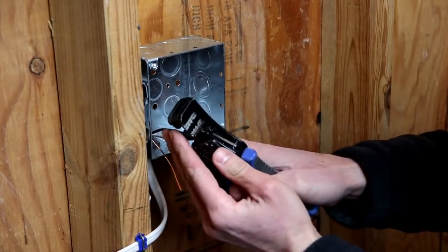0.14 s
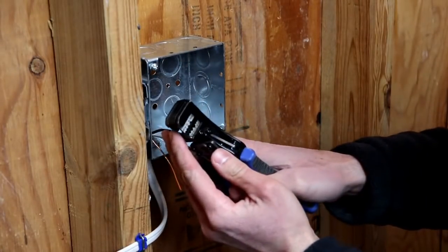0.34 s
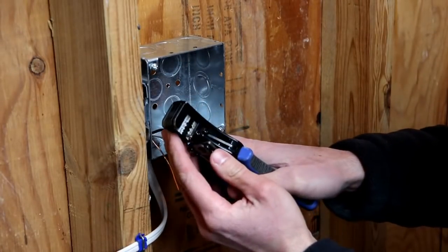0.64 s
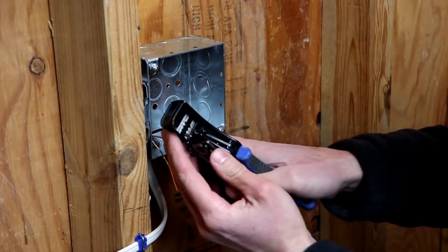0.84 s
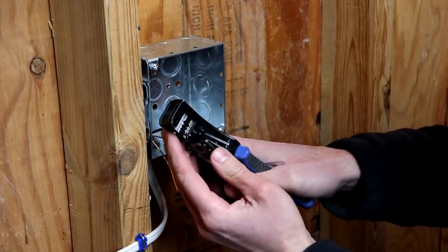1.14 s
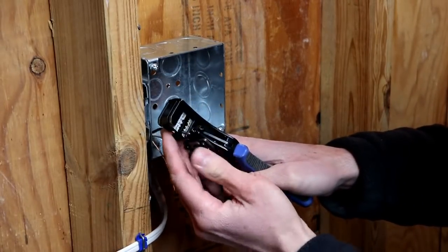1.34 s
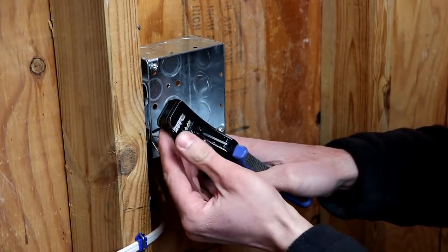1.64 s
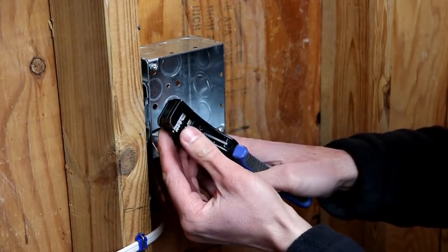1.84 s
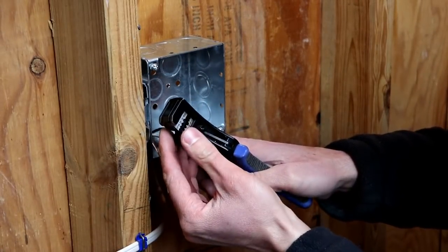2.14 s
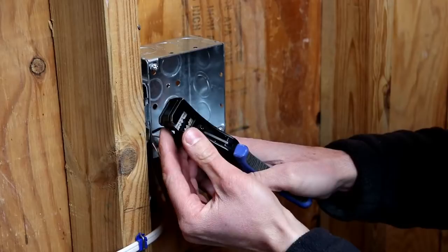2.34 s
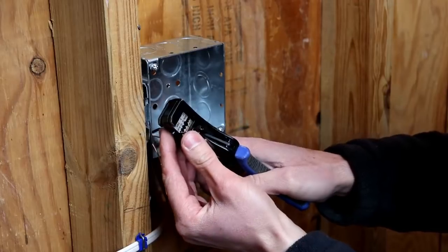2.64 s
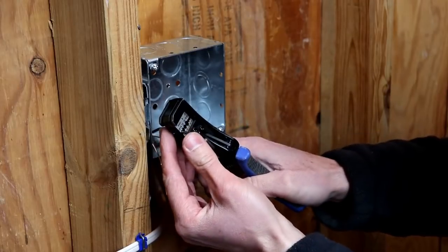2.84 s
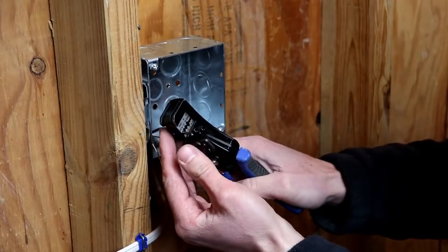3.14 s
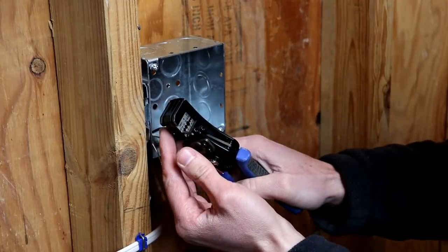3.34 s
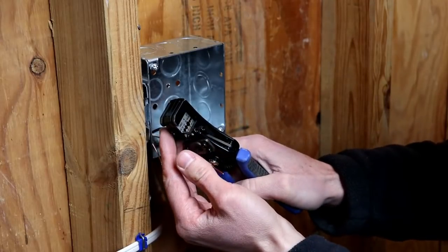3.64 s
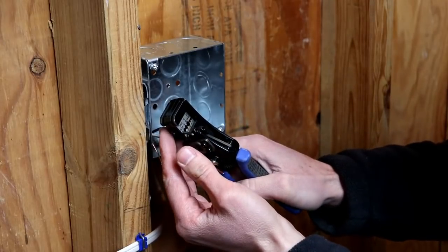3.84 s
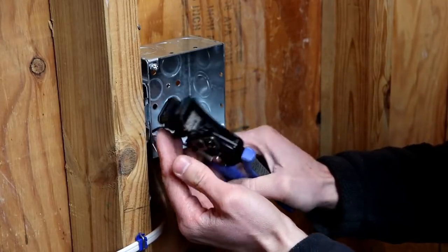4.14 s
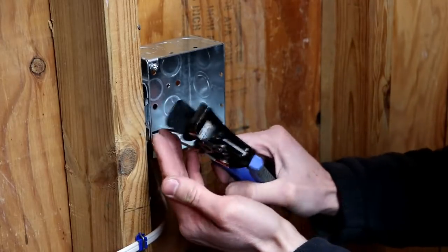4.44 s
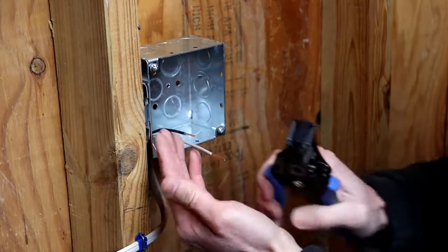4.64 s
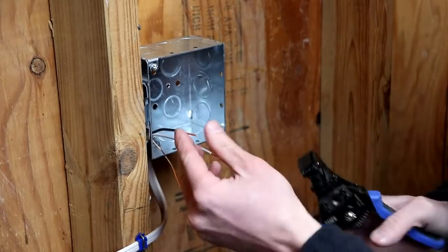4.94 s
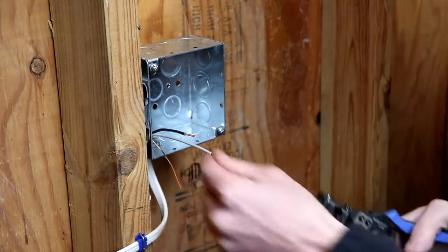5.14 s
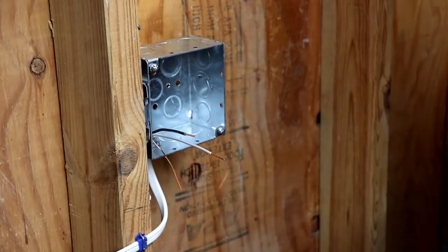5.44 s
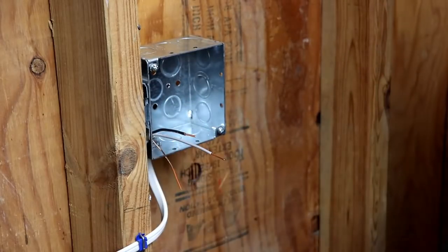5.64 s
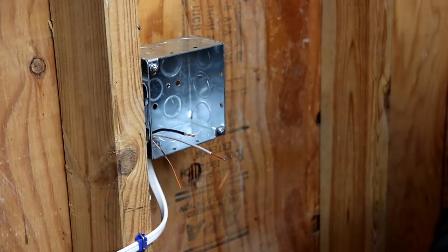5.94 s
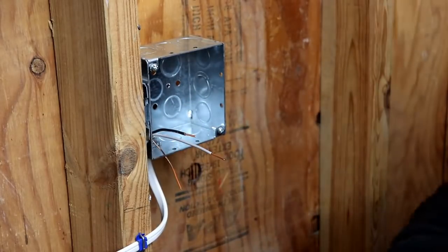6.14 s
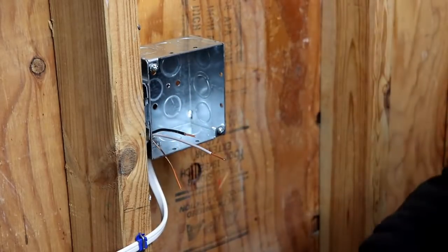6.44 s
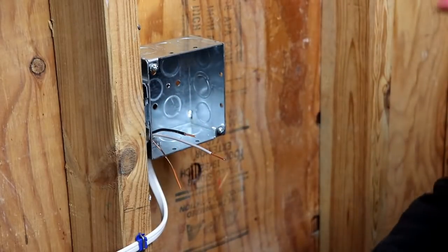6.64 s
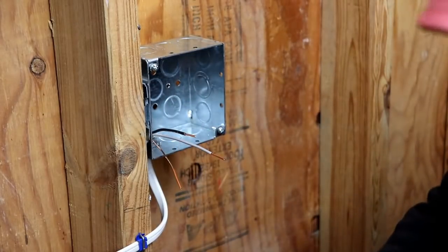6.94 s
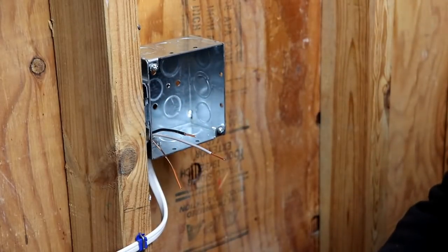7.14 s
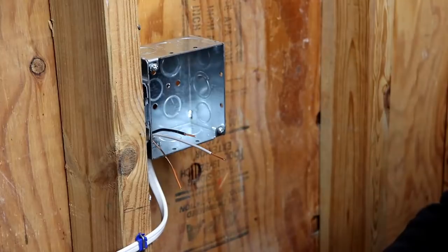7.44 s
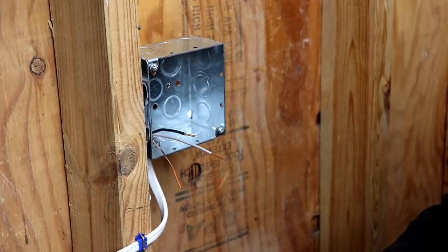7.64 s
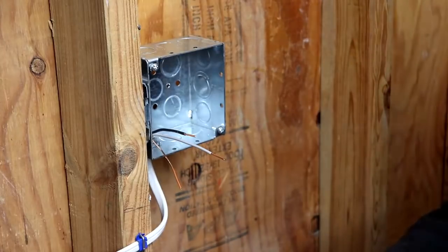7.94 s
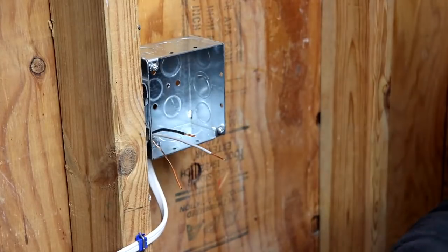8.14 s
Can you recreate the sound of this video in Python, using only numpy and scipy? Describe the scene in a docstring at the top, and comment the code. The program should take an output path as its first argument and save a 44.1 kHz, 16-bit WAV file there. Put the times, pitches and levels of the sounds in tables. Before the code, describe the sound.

A close mono microphone in a timber room picks up steady low mains hum and soft hiss. From 0 to 4 seconds there are only sparse, faint ticks and hollow clicks of wire strippers gripping cable, slightly clearer near 1.6, 2.2 and 2.8-2.9. At 4.2 the squeeze begins: a low shudder, a gritty ringing tear and a rapid ratchet of ticks until about 4.4. Hollow clacks cluster at 4.5, then a piercing steel spring snap at 4.65, loud enough to clip, with short room echo. Small clicks follow at 4.8-5.2, with a dry tap at 5.25 and soft sleeve rustles to 6.5. At 6.67 the tool lands on wood with heavy, resonant knocks, tipping again at 6.86-6.9 and settling by 7.15. Cloth rubs, light taps and short hard scrapes come at 7.3-7.9, strongest around 7.7, before a fading rustle and a tiny click near 8.

```python
"""In a timber room, automatic wire strippers work on a cable in a steel outlet box on the wall.
The jaws tick as they grip, tear the insulation off, clack open and snap back on their spring.
Then the tool lands on wood with heavy knocks, something hard is slid over it and a sleeve rustles.
Each hit is a crack and fast-fading noise shaped by its body; tearing, cloth and scraping are shaped noise.
Mains hum (sine tones) and hiss (steady noise) lie under it all."""
import sys
import numpy as np
from scipy import signal
from scipy.fft import rfft, irfft, next_fast_len
from scipy.io import wavfile
from scipy.ndimage import map_coordinates

SR = 44100
rng = np.random.default_rng(int(sys.argv[2]) if len(sys.argv) > 2 else 0)


def unload_wav(signal):
    """Save mono or channel-first audio to the path in sys.argv[1] as 16-bit WAV at rate SR, clipped to [-1, 1]."""
    wavfile.write(
        sys.argv[1],
        SR,
        np.round(np.clip(np.atleast_2d(signal).T, -1, 1) * 32767).astype(np.int16),
    )


N = 365588
TIME = np.arange(N) / SR


def from_db(db):
    """Turn decibels into gain."""
    return 10 ** (np.asarray(db) / 20)


def rms_one(x):
    """Scale each row to an average strength (rms) of 1."""
    return x / np.sqrt(np.mean(x ** 2, axis=-1, keepdims=True) + 1e-30)


def at_hz(points, hz):
    """Read a table between its points, with pitch spaced as the ear hears it (log frequency)."""
    freqs, values = np.transpose(points)
    return np.interp(np.log(hz), np.log(freqs), values)


def fade(t, t60):
    """Die away freely, 60 dB down after t60 seconds."""
    return np.exp(-np.log(1000) * t / np.maximum(t60, 1e-3))


def flicker(size):
    """Wander smoothly at random, changing over about size samples; rms 1."""
    knots = rng.standard_normal(N // size + 2)
    return rms_one(np.interp(np.arange(N) / size, np.arange(len(knots)), knots))


def coloured(spectrum):
    """Make steady noise that follows a spectrum; rms 1."""
    size = next_fast_len(N, True)
    hz = np.maximum(np.fft.rfftfreq(size, 1 / SR), 1)
    white = rfft(rng.standard_normal(size))
    return rms_one(irfft(white * from_db(at_hz(spectrum, hz)), size)[:N])


def patchy(x, patchy_db):
    """Let patches about a third of an octave wide swell and sink every few hundredths of a second."""
    hz, s, cells = signal.stft(x, SR, nperseg=512)
    where = np.meshgrid(3 * np.log2(1 + hz / 200), 40 * s, indexing="ij")
    swell = map_coordinates(rng.standard_normal((24, 400)), where, order=1)
    _, patched = signal.istft(cells * from_db(patchy_db * swell), SR)
    return rms_one(patched[:N])


def swells(middles, half_lengths, levels_db):
    """Each stroke swells and sinks in a bell shape; overlapping strokes add in power."""
    t = TIME[::64]
    power = 0
    for s, half, db in zip(middles, half_lengths, levels_db):
        bell = from_db(db) / (1 + ((t - s) / half) ** 2)
        power = power + bell ** 2
    return np.interp(TIME, t, np.sqrt(power))


def resonate(x, modes):
    """Let a body's clear resonances ring on top of the sound."""
    out = x
    for hz, width, db in modes:
        r = np.exp(-np.pi * width / SR)
        poles = [1, -2 * r * np.cos(2 * np.pi * hz / SR), r * r]
        ringing = (1 - r * r) / 2 * signal.lfilter([1, 0, -1], poles, x + 1e-18)
        out = out + from_db(db) * ringing
    return out


def causal(gain):
    """Minimum-phase response with these gains: it rings after a blow, never before."""
    cepstrum = irfft(np.log(gain + 1e-9))
    half = cepstrum.shape[-1] // 2
    fold = np.r_[1, np.full(half - 1, 2), 1, np.zeros(half - 1)]
    return np.exp(rfft(cepstrum * fold))


def broad_level(spectra):
    """Average the strength over half an octave around each frequency."""
    bins = np.arange(spectra.shape[-1])
    low = (bins * .84).astype(int)
    high = np.minimum((bins * 1.19).astype(int) + 3, len(bins))
    total = np.cumsum(np.pad(np.abs(spectra) ** 2, [(0, 0), (1, 0)]), axis=-1)
    return np.sqrt((total[:, high] - total[:, low]) / (high - low))


def contacts(rows, spectrum, crack, favour_db, favour_octaves):
    """Each contact is a crack and a fast-dying jumble in the body's colour; where it lands favours one pitch."""
    s, db, tilt_db, t60, pitch = np.transpose(rows)[:, :, None]
    t = np.arange(8192) / SR
    hz = np.maximum(np.fft.rfftfreq(len(t), 1 / SR), 1)
    envelope = fade(t, t60)
    bursts = rng.standard_normal((len(rows), len(t))) * envelope
    bursts[:, 0] += crack
    spectra = rfft(bursts)
    octaves = np.log2(hz / pitch)
    favoured_db = favour_db / (1 + (octaves / favour_octaves) ** 2)
    colour_db = at_hz(spectrum, hz) + tilt_db * octaves + favoured_db
    body = causal(from_db(colour_db) / broad_level(spectra))
    sounds = rms_one(irfft(spectra * body))
    # a slower fade carries more energy at the same level
    sounds = sounds * from_db(db) * np.sqrt(np.mean(envelope ** 2, axis=1, keepdims=True))
    out = np.zeros(N + len(t))
    for start, sound in zip((s[:, 0] * SR).astype(int), sounds):
        out[start:start + len(t)] += sound
    return out[:N]


def blows(rows, lag, rattle_db, rattle_t60, rattle_tilt_db, rattle_hz):
    """Add a softer rattle lag seconds after each contact, pitched midway between contact and body."""
    rattles = []
    for s, db, tilt, t60, hz in rows:
        midway_hz = np.sqrt(hz * rattle_hz)
        rattles.append((s + lag, db + rattle_db, tilt + rattle_tilt_db, rattle_t60, midway_hz))
    return list(rows) + rattles


# mains tones: (frequency [Hz], level [dB])
HUM_TONES = [(59.9, -49.5), (180, -69.5)]


def mains_hum():
    """The mains hums as steady sine tones, each starting at a random point of its cycle."""
    hum = 0
    for hz, db in HUM_TONES:
        hum = hum + np.sqrt(2) * from_db(db) * np.sin(2 * np.pi * (hz * TIME + rng.random()))
    return hum


# colour of the hiss: (frequency [Hz], relative level [dB per Hz])
HISS_COLOUR = [(25, -7.5), (80, -1), (110, -6), (177, -3.5), (205, -5.5), (320, -9.5), (379, -8),
               (580, -11), (1030, -12), (1320, -14.5), (1740, -15.5), (2440, -17.5), (7200, -22),
               (15800, -28)]


def hiss():
    """Steady noise, strongest in the bass."""
    return from_db(-57) * coloured(HISS_COLOUR)


# how long the room rings: (frequency [Hz], time to fade by 60 dB [s])
ROOM_T60 = [(100, 0.66), (400, 0.38), (1500, 0.41), (4000, 0.26), (8000, 0.26), (15000, 0.08)]
EDGES = np.geomspace(22, 17000, 29)   # edges of the echo's pitch bands [Hz]
# each band: (middle [Hz], width [Hz], filter)
BANDS = [(np.sqrt(lo * hi), hi - lo, signal.butter(2, [lo, hi], "band", fs=SR, output="sos"))
         for lo, hi in zip(EDGES, EDGES[1:])]


def workshop(x):
    """Diffuse echo of the timber room: it builds up in a few milliseconds and dies sooner in the treble."""
    t = np.arange(SR * 2 // 3) / SR
    build_up = 1 - np.exp(-(t / 0.0078) ** 2)
    echo = 0
    for hz, width, sos in BANDS:
        noise = rng.standard_normal(len(t)) * build_up * fade(t, at_hz(ROOM_T60, hz))
        band = signal.sosfilt(sos, noise)
        echo = echo + rms_one(band) * np.sqrt(2 * width / SR / len(t))
    return signal.fftconvolve(x, echo)[:N]


# strokes of the sleeve as the arms move:
# (middle time [s], half length [s], rubbing level [dB], fine swish level [dB])
SLEEVE_STROKES = [(4.94, 0.055, -49, -76.5), (5.163, .08, -50.5, -62.5), (5.426, 0.14, -52.5, -71.5),
                  (5.614, 0.064, -58, -51.5), (5.751, .045, -69, -52.5), (5.922, 0.045, -60, -60),
                  (6.088, 0.085, -49.5, -63), (6.431, 0.13, -69, -57), (6.546, 0.02, -51, -118),
                  (7.06, 0.41, -48, -61), (7.48, 0.068, -42.5, -53), (7.654, 0.049, -48, -54.5),
                  (7.746, 0.034, -37.5, -60), (7.852, 0.048, -40.5, -48), (8.103, 0.21, -55.5, -62)]
# colours of the rub and the swish: (frequency [Hz], relative level [dB per Hz])
RUB_COLOUR = [(30, -16.5), (120, -7), (280, 7.5), (800, 5.5), (1600, -2), (3200, -2.5), (5000, -9.5),
              (8000, -17), (15000, -32.5)]
SWISH_COLOUR = [(1000, -15.5), (4000, 0), (8000, -8.5), (13000, -8), (16000, -24.5)]


def sleeve(crease_db):
    """Cloth fibres catch and slip: a broad, patchy rub, a fine swish and creases that flick over."""
    s, half, rub_db, swish_db = np.transpose(SLEEVE_STROKES)
    rub, swish = swells(s, half, rub_db), swells(s, half, swish_db)
    flicks = (rng.random(N) < 130 / SR) * rng.standard_normal(N)   # about 130 a second
    crease = coloured(TAP_COLOUR)[:1024] * fade(TIME[:1024], t60=.018)   # same colour as the taps
    creases = from_db(crease_db) * rms_one(signal.oaconvolve(flicks, crease)[:N])
    cloth = patchy(coloured(RUB_COLOUR), patchy_db=3.5)
    return rub * (cloth + creases) + swish * coloured(SWISH_COLOUR)


# slides over the wood: (middle time [s], half length [s], level [dB])
SCRAPES = [(7.44, .02, -46), (7.701, 0.017, -31), (7.754, .028, -33), (7.854, 0.0304, -51.5)]
# colour of the scraping: (frequency [Hz], relative level [dB per Hz])
SCRAPE_COLOUR = [(100, -4), (500, -3.5), (1500, -6), (3200, 8.5), (6000, 2), (9000, -11), (15000, -33)]
# ringing of the scraping: (frequency [Hz], width [Hz], level over the plain noise [dB])
SCRAPE_MODES = [(1440, 32, -2.5), (1500, 48, 19.5), (2520, 220, 4), (3150, 150, -11)]


def scrape(grain_db):
    """Something hard slides over the wood: its edge catches on the grain and rings briefly."""
    grains = coloured(SCRAPE_COLOUR) * from_db(grain_db * flicker(size=140))
    return swells(*np.transpose(SCRAPES)) * rms_one(resonate(grains, SCRAPE_MODES))


# dry taps against things nearby: (time [s], level before mixing [dB], brightness [dB per octave],
# time to fade by 60 dB [s], favoured pitch [Hz])
TAPS = [(5.246, -23, -.5, 0.048, 3440), (5.479, -40, .5, .1, 3500), (6.040, -45.5, -0.5, 0.024, 3840),
        (7.341, -38.5, -9.5, 0.034, 1215), (7.380, -42, -9.5, .049, 1260), (7.445, -36, -3, .05, 3320),
        (7.449, -41.5, -1.5, .09, 970), (7.631, -35.5, 3, 0.023, 2240), (7.728, -32.5, -1.5, .15, 1660),
        (7.911, -43, 4.5, 0.16, 2700)]
# colour of a tap: (frequency [Hz], relative level [dB per Hz])
TAP_COLOUR = [(20, -64.5), (200, -13), (500, -7), (1000, 8), (2000, 3), (4000, 3.5), (6000, -3),
              (9000, -16), (15000, -34.5)]


def nearby_taps():
    """Short hits make things nearby crack and rattle, with no clear ringing."""
    hits = blows(TAPS, lag=0.011, rattle_db=-12, rattle_t60=0.17, rattle_tilt_db=-3, rattle_hz=1540)
    return from_db(5.5) * contacts(hits, TAP_COLOUR, crack=1.2, favour_db=6.0, favour_octaves=0.21)


# the tool lands, tips over and settles: (time [s], level [dB], brightness [dB per octave],
# time to fade by 60 dB [s], favoured pitch [Hz])
THUDS = [(6.667, -4.5, 0, 0.05, 370), (6.672, -9.5, 2.5, 0.026, 543), (6.7105, -11.5, -1, 0.054, 265),
         (6.758, -23.5, 2.5, 0.063, 285), (6.853, -20, 6, 0.078, 2450), (6.861, -10.5, -1, 0.059, 111),
         (6.868, -10.5, -.5, 0.099, 204), (6.887, -1.5, 2.5, 0.041, 1030), (6.894, -14, 4, 0.12, 1450),
         (6.985, -18.5, 0.5, 0.074, 202), (7.140, -33.5, -5, 0.068, 134)]
# colour of the wood: (frequency [Hz], relative level [dB per Hz])
WOOD_COLOUR = [(20, -30), (90, -4), (220, 3), (420, 5.5), (750, -5), (1300, -18.5), (2200, -28),
               (3800, -31.5), (6000, -48), (15000, -61.5)]
# clear ringing of the wood: (frequency [Hz], width [Hz], level over the dense ringing [dB])
WOOD_MODES = [(206, 18, -0.5), (285, 8.6, -6.5), (408, 31, -6), (516, 41, -19.5), (820, 61, -4),
              (1217, 99, 6), (1640, 120, 2.5)]


def wood_knocks():
    """The tool knocks on wood, which answers with a low jumble and a few clear resonances."""
    hits = blows(THUDS, lag=.027, rattle_db=-25, rattle_t60=.33, rattle_tilt_db=-0.5, rattle_hz=2200)
    knocks = contacts(hits, WOOD_COLOUR, crack=3.94, favour_db=10.5, favour_octaves=0.33)
    return resonate(knocks, WOOD_MODES)


# the squeeze that strips the cable, then the jerk that frees the tool:
# (start time [s], time from start to letting go [s], level [dB])
PULLS = [(4.199, 0.15, -28), (4.492, .04, -42)]


def pull_force(release_t60):
    """Each pull builds quickly, holds and lets go."""
    force = 0
    for s, hold, db in PULLS:
        build_up = np.clip((TIME - s) / 0.017, 0, 1)   # full force after 17 ms
        release = fade(np.maximum(TIME - s - hold, 0), release_t60)
        force = force + from_db(db) * build_up * release
    return force


# colours of the shuddering wall and the tearing: (frequency [Hz], relative level [dB per Hz])
TUG_COLOUR = [(20, -28), (30, -13), (40, 8), (55, -6.5), (100, -0.5), (150, -12.5), (205, -4.5),
              (300, -19.5), (600, -32), (1500, -81.5)]
TEAR_COLOUR = [(100, -30.5), (500, 9.5), (1000, -7), (2200, 4), (4500, 4), (8000, -4), (15000, -7)]
# the dragging jaws ring: (frequency [Hz], width [Hz], level over the plain noise [dB])
TEAR_MODES = [(1048, 60, 22.5), (1600, 60, 11), (1986, 60, 11.5), (2283, 21, 14.5), (3700, 220, 4.5),
              (4720, 60, -5)]


def cable_tug(tear_db, grain_db):
    """The wall shudders under the pull while insulation catches, tears and drags along in fine grains."""
    pull = pull_force(release_t60=0.47)
    sway = from_db(-24) * pull_force(release_t60=3.5)   # the wall sways on after a pull
    grains = from_db(grain_db * (flicker(size=60) + flicker(size=260)))
    tearing = rms_one(resonate(coloured(TEAR_COLOUR) * grains, TEAR_MODES))
    return (pull + sway) * coloured(TUG_COLOUR) + pull * from_db(tear_db) * tearing


# hollow clacks of the tool's body: (time [s], level before mixing [dB], brightness [dB per octave],
# time to fade by 60 dB [s], favoured pitch [Hz])
CLACKS = [(.039, -53, 2, .2, 990), (.178, -45.5, 3, 0.088, 990), (.669, -47.5, -1, 0.051, 3900),
          (1.622, -41.5, 0.5, 0.08, 3700), (1.626, -45, -6, 0.3, 680), (2.197, -43, -2.5, 0.11, 4830),
          (2.850, -51.5, -3.5, .08, 1730), (2.931, -45.5, 1.5, 0.2, 1830), (4.218, -30, -6.5, .05, 1490),
          (4.367, -22.5, -7.5, 0.059, 816), (4.508, -17.5, 5, .085, 905), (4.516, -20.5, -1.5, 0.059, 520),
          (4.534, -16.5, -.5, 0.12, 1060), (4.541, -10.5, 5, 0.034, 1310), (4.562, -21.5, -5.5, 0.04, 1320),
          (4.593, -29.5, -2.5, .06, 1030), (4.933, -32, -7, 0.14, 1414), (4.944, -28.5, 0, 0.073, 735),
          (5.149, -39.5, -5.5, .1, 2000), (5.161, -33, -5.5, .12, 1900)]
# colour of the handles: (frequency [Hz], relative level [dB per Hz])
HANDLE_COLOUR = [(20, -45), (150, -5.5), (400, -3), (650, 5.5), (1000, -1.5), (1500, -3), (2200, -3.5),
                 (4000, -8), (7000, -17), (15000, -34)]
# clear ringing of the handles: (frequency [Hz], width [Hz], level over the dense ringing [dB])
HANDLE_MODES = [(698, 13, 1), (904, 49, 0.5), (1021, 70, 11), (1420, 58, 8.5), (1485, 110, 8.5),
                (1970, 110, 8.5), (2460, 50, 6), (3775, 90, 6)]


def handle_clacks():
    """The tool's body clacks hollowly, rings, and its loose parts rattle on."""
    hits = blows(CLACKS, lag=.009, rattle_db=-12, rattle_t60=.11, rattle_tilt_db=-1, rattle_hz=420)
    clacks = contacts(hits, HANDLE_COLOUR, crack=1.3, favour_db=13.5, favour_octaves=0.4)
    return from_db(-4.0) * resonate(clacks, HANDLE_MODES)


def slips(count, uneven_s, spread_db):
    """Under the squeeze the jaws slip along the wire in a quick, nearly even run of ticks."""
    start_s, gap_s, level_db = 4.228, 0.022, -36.5   # level before mixing
    tilt_db, t60, pitch_hz = -4, 0.044, 2100
    ticks = []
    for k, (late, hard) in enumerate(rng.standard_normal((count, 2))):
        time_s = start_s + k * gap_s + uneven_s * late
        ticks.append((time_s, level_db + spread_db * hard, tilt_db, t60, pitch_hz))
    return ticks


# small steel parts of the jaws clicking; the loudest is the spring snapping them back:
# (time [s], level before mixing [dB], brightness [dB per octave],
# time to fade by 60 dB [s], favoured pitch [Hz])
CLICKS = [(2.780, -47, -1, 0.029, 5640), (2.903, -51, 0, 0.027, 13000), (2.915, -49, -5.5, 0.043, 5600),
          (4.216, -36.5, 1, 0.064, 1600), (4.2937, -24.5, 2.5, 0.032, 2200),
          (4.357, -21.5, -16.5, 0.047, 4970), (4.3825, -39, -1, 0.022, 12000),
          (4.508, -19, -9.5, 0.072, 2650), (4.5385, -17, 4.5, 0.027, 11400),
          (4.594, -32.5, 6.5, .045, 10500), (4.6395, -24, 5.5, 0.086, 11000),
          (4.6457, -12.5, 0.5, 0.027, 9000), (4.6548, 7, 0.5, 0.022, 4220), (4.659, -6.5, 10, 0.042, 3280),
          (4.7915, -30.5, -2.5, 0.063, 4730), (4.799, -35, 2, 0.029, 12200), (4.807, -41, -7, .025, 4000),
          (4.945, -41.5, 3.5, .029, 4870), (5.0905, -38, -5.5, .016, 3900), (7.228, -40.5, -6, 0.037, 5900),
          (7.510, -46.5, 0, 0.035, 7540), (7.566, -45.5, 2.5, 0.018, 7950), (8.017, -49.5, 4, .02, 9800)]
# colour of the jaws: (frequency [Hz], relative level [dB per Hz])
JAW_COLOUR = [(20, -55), (200, -30.5), (1000, -13), (2000, -13), (3400, -4.5), (5200, -5), (6500, -7.5),
              (12000, -12), (15500, -21)]
# clear ringing of the jaws: (frequency [Hz], width [Hz], level over the dense ringing [dB])
JAW_MODES = [(3320, 43, 5.5), (3790, 84, 3), (5130, 33, -0.5), (5260, 94, 3.5), (6170, 20, 5.5),
             (7138, 25, 3), (10090, 25, 1), (10550, 28, -6), (11060, 30, -17), (12080, 180, 5.5)]


def jaw_clicks():
    """Steel jaws click, slip and snap; the small parts ring brightly and rattle on after each click."""
    hits = blows(CLICKS, lag=0.014, rattle_db=-37.5, rattle_t60=0.27, rattle_tilt_db=-3, rattle_hz=5500)
    ticks = hits + slips(count=7, uneven_s=0.0019, spread_db=2.0)
    clicks = contacts(ticks, JAW_COLOUR, crack=4.7, favour_db=6.5, favour_octaves=0.14)
    return from_db(3.5) * resonate(clicks, JAW_MODES)


def scene():
    """Things near the microphone sound dry, those farther off bring more of the room."""
    jaws = jaw_clicks()
    handles = handle_clacks()
    taps = nearby_taps() + scrape(grain_db=1.5)
    wood = wood_knocks()
    into_room = from_db(-11.0) * jaws + from_db(-9) * handles + from_db(-12) * taps + from_db(-6.0) * wood
    tool = jaws + handles + taps + wood + workshop(into_room)
    tug = cable_tug(tear_db=-9.5, grain_db=-2.0)
    mix = tool + tug + sleeve(crease_db=-9.5) + mains_hum() + hiss()
    return mix[None]   # one channel


def limiter(x, threshold_db, release_db_per_s, attack_s):
    """Loud peaks pull the gain down; it creeps back afterwards."""
    over_db = np.maximum(20 * np.log10(np.abs(x) + 1e-9) - threshold_db, 0)
    creep_db = release_db_per_s * TIME
    held_db = np.maximum.accumulate(over_db + creep_db, axis=-1) - creep_db
    r = np.exp(-1 / (attack_s * SR))
    return x * from_db(-signal.lfilter([1 - r], [1, -r], held_db))


def record(dry):
    """The limiter ducks after the snap, what escapes it clips, and the top is cut."""
    limited = limiter(dry, threshold_db=2.5, release_db_per_s=66.5, attack_s=0.0013)
    clipped = np.clip(limited, -1, 1)
    top_cut = signal.ellip(10, .1, 70, 15800, fs=SR, output="sos")   # low-pass at 15800 Hz
    return signal.sosfilt(top_cut, clipped)


dry = scene()
out = record(dry)
unload_wav(out)
```